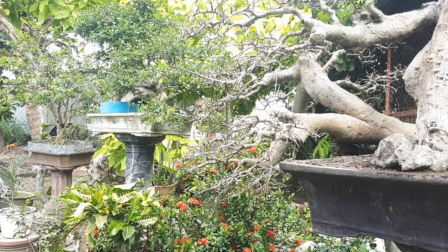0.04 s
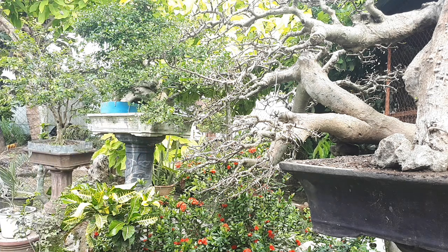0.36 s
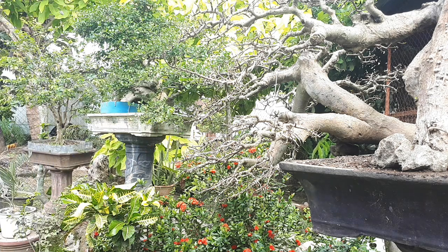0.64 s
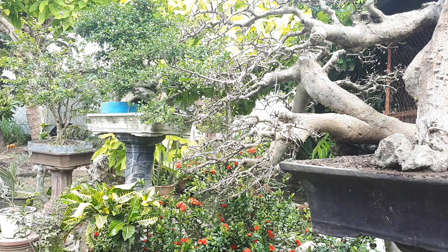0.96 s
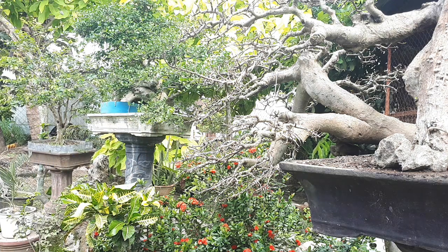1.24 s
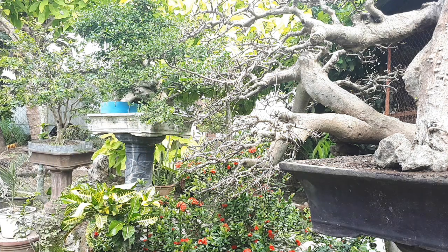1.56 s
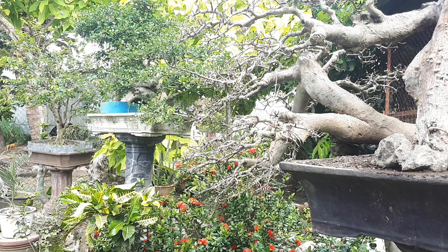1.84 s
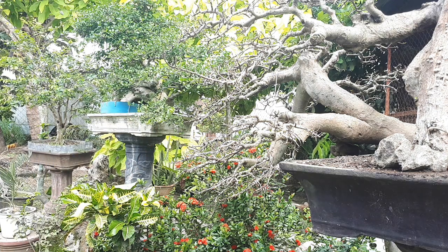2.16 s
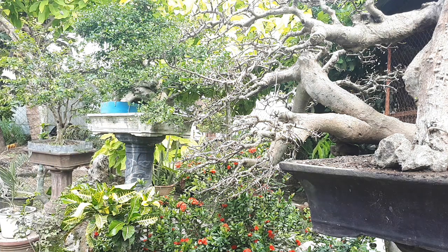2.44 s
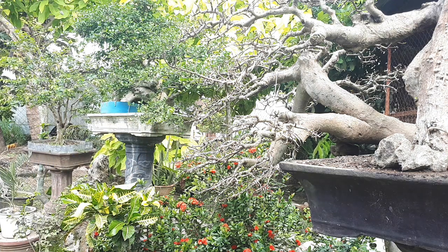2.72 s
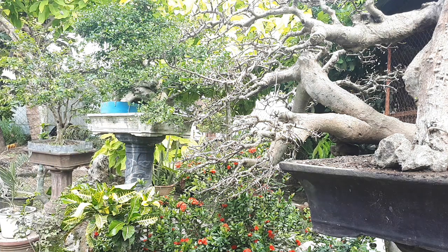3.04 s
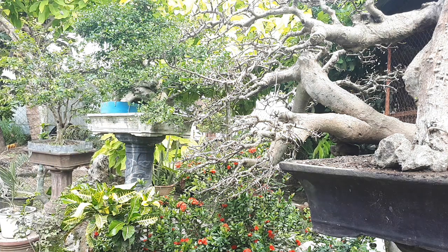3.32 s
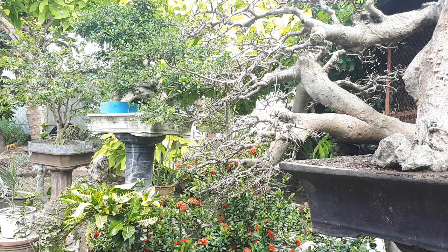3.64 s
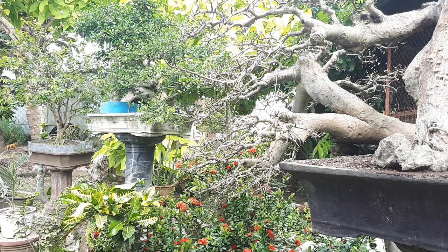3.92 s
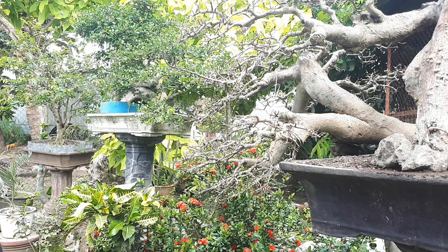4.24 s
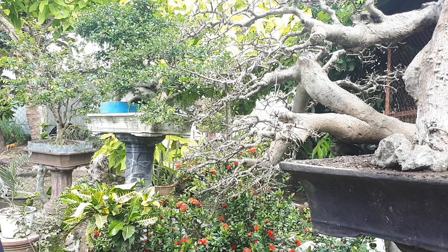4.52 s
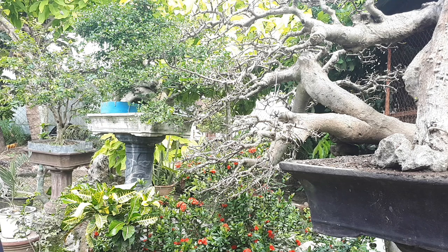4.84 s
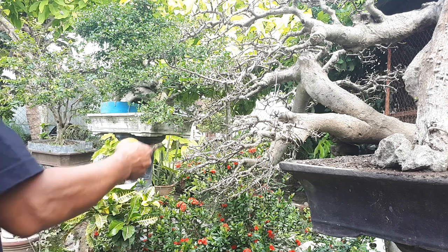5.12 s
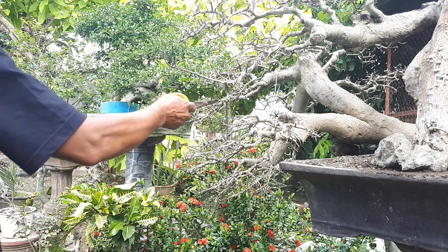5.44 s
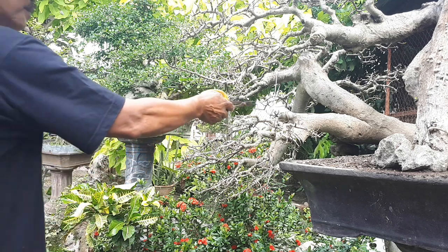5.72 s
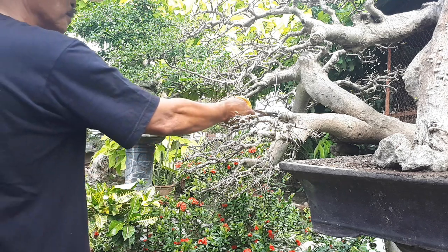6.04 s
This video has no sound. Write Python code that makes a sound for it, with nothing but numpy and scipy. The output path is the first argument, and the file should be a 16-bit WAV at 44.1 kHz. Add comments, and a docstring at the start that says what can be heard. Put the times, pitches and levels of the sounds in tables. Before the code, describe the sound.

In a walled garden, a dove coos in repeated phrases of clear hoots and throaty purrs. Early on, sandals crunch on grit, a higher dove answers with pure notes and a small bird gives three sharp chirps. Midway a myna squawks five harsh syllables. The cooing stops near the end, leaving a few soft foot scuffs. The calls ring slightly off the walls over low distant traffic and a soft hiss.

```python
"""Two doves coo in a walled garden: the lower slides between a clear hoot and a throaty purr of beating
tones and puffs, the higher answers in pure notes. A myna squawks five harsh syllables, a small bird
whistles trilled chips, faint hoots come from afar. Sandals tick and scuff on the paving, leaves rustle.
The walls ring after every call, over the low hum of distant traffic."""
import sys
import numpy as np
from scipy import signal
from scipy.fft import rfft, irfft, next_fast_len
from scipy.io import wavfile
from scipy.ndimage import uniform_filter1d, minimum_filter1d, map_coordinates

SR = 44100
rng = np.random.default_rng(int(sys.argv[2]) if len(sys.argv) > 2 else 0)


def transcribe(signal):
    """Save signal, clipped to [-1, 1], as a 16-bit WAV file at the path in sys.argv[1]."""
    frames = np.atleast_2d(signal).T
    limited = np.clip(frames, -1, 1)
    pcm = np.round(limited * 32767).astype(np.int16)
    wavfile.write(sys.argv[1], SR, pcm)


N = 272273


# clear hoots: (start [s], length [s], level [dB], pitch [Hz], glide [Hz/s])
LOW_HOOTS = [(-.02, .11, -34.5, 615, -1), (0.19, .085, -15, 622, 1.5), (.315, .055, -18, 623, 1),
             (0.421, .105, -12.5, 622, 1.5), (0.566, .045, -13, 570, -500),
             (1.793, .07, -15.5, 626.8, -0.5), (2.027, .165, -12, 618.3, -19.5),
             (2.405, .125, -13.5, 628, 0), (2.604, .06, -14.5, 625.5, 0.5),
             (2.669, .078, -10.5, 626.6, -45.5), (2.767, .085, -15, 583, -950),
             (3.32, .35, -37, 466.7, -170), (3.725, .072, -14.5, 619.5, -2.5), (3.934, .15, -10, 622.3, 5),
             (4.509, .13, -11.5, 621.3, -57), (4.655, .085, -15, 585, -900)]


def hoots(arch_hz=14, roundness=0.54):
    """Strength and pitch of the lower dove's clear voice: both arch over each hoot."""
    total, weighted_hz = np.zeros((2, N))
    for start, length, db, hz, glide in LOW_HOOTS:
        arch = swell(start, length)
        size = amp(db) * arch ** roundness * (arch > 1e-6)
        total += size
        weighted_hz += size * (hz + glide * (clock() - start - length / 2) - arch_hz * (1 - arch))
    return total, weighted_hz / (total + 1e-12)


# throaty rolls: (start [s], hold [s], release [s], level [dB], pitch [Hz], puff share [0-1])
LOW_ROLLS = [(-.02, .05, .1, -35.5, 619.5, 0.3), (.168, .14, 0.054, -21.5, 617.3, 0.84),
             (0.315, 0.043, 0.11, -17, 620, 0.84), (0.409, 0.1229, 0.095, -21.5, 615, .75),
             (0.551, .035, 0.29, -18, 595, .55), (1.369, 0.0997, 0.14, -24.5, 600, 0.7),
             (1.553, 0.1601, 0.15, -20, 603.5, 0.6), (1.796, 0.0576, 0.17, -20.5, 621.4, .6),
             (1.98, 0.0696, 0.099, -20, 599.4, 0.94), (2.126, 0.05907, 0.17, -26, 606.4, 0.6),
             (2.37, 0.199, 0.092, -21.5, 619.2, 0.59), (2.622, 0.0712, 0.12, -22.5, 619, .5),
             (2.782, 0.04034, 0.2173, -20, 585.5, 0.6), (2.98, 0.29, .2, -23.5, 600, 0.74),
             (3.705, 0.089, .1, -25, 613.3, .6), (3.876, 0.42, 0.074, -24.5, 606.5, .7),
             (4.282, .2, 0.21, -17.5, 611, 0.66), (4.645, 0.0853, 0.2, -19, 591, 0.65)]


def rolls(attack_s=0.0299, sag_hz_per_s=380):
    """Strength, pitch and puff share of the purr: each roll sets in, holds, then fades and sinks."""
    power, pitch, share = np.zeros((3, N))
    for start, hold, release, db, hz, puffy in LOW_ROLLS:
        dying_s = np.clip(clock() - start - hold, 0, 2 * release)
        edge = gate(start, hold + 1.25 * release, attack_s, release / 4)
        size = edge * amp(db - 20 * dying_s / release)
        power += size ** 2
        pitch += size ** 2 * (hz - sag_hz_per_s * dying_s)
        share += size ** 2 * puffy
    return np.sqrt(power), pitch / (power + 1e-12), np.clip(share / (power + 1e-12), 0, 1)


def puff_train(pitch, rate_hz, scatter, width_s, spread_db):
    """The voice breaks into short, uneven puffs of tone, each starting afresh."""
    beats = np.arange(int(N / SR * rate_hz))
    chance = rng.standard_normal((len(beats), 4))  # timing, pitch, size, phase
    centres = np.clip((beats + scatter * chance[:, 0]) / rate_hz * SR, 0, N - 1).astype(int)
    offsets = np.arange(-(SR // 50), SR // 50)
    t = offsets / SR
    hz = pitch[centres, None] * (1 + 0.043 * chance[:, 1:2])
    size = amp(spread_db * chance[:, 2:3]) * np.exp(-.5 * (t / width_s) ** 2)
    puffs = size * np.cos(2 * np.pi * hz * t + np.pi * chance[:, 3:])
    train = np.bincount(np.clip(centres[:, None] + offsets, 0, N).ravel(), puffs.ravel(), N + 1)[:N]
    # air pressure holds the mean strength steady over several puffs
    return train / np.sqrt(np.abs(uniform_filter1d(train ** 2, SR // 16)) + 1e-6)


def low_dove(beat_hz=82, purr_ducking=2.4):
    """A hoot breaks into a purr: a second, lower tone beats with it and the voice comes in puffs."""
    hoot_size, hoot_hz = hoots()
    purr_size, purr_hz, share = rolls()
    purr_size = purr_size / (1 + purr_ducking * hoot_size)
    lower_hz = purr_hz - beat_hz
    rough = purr_size / (purr_size + hoot_size + 1e-6)
    phase = cycle(hoot_hz * (1 + 0.0309 * rough ** 2 * wobble(110)))
    hoot = np.sqrt(2) * (np.sin(phase) + amp(-51.5) * np.sin(2 * phase))
    lower_size = np.sqrt(2) * amp(2.4 * wobble(70))
    lower = lower_size * np.sin(cycle(lower_hz * (1 + 0.04114 * share * wobble(110))))
    mid_hz = (purr_hz + lower_hz) / 2
    puffs = puff_train(mid_hz, rate_hz=63.83, scatter=0.158, width_s=0.0023, spread_db=-0.5)
    # the swollen throat passes only a faint overtone
    overtone = amp(-32) * puff_train(2 * mid_hz, rate_hz=63.2, scatter=0.23, width_s=0.001, spread_db=-5)
    purr = np.sqrt(1 - share) * lower + np.sqrt(share) * puffs + overtone
    return amp(2.5) * (hoot_size * hoot + purr_size * purr)


# answering coos: (start [s], rise [s], top pitch [Hz], sink [Hz/s], level [dB],
# time to crest [s], crest [dB], fade [dB/s])
HIGH_NOTES = [(0.531, 0.1, 806.3, 286.5, -19.5, 0.28, 7, 99.5),
              (1.03, .05, 794.6, 249, -20, 0.16, 8.5, 122.5),
              (1.375, .05, 791, 269.8, -19, 0.15, 8.5, 120.5),
              (1.76, 0.057, 773.5, 182, -15.5, 0.17, 5, 48.5)]


def high_dove(scoop_hz=96.8, max_sink_hz=75, crest_width_s=.048, waver=.006, tremor_db=2.0):
    """Nearly pure notes that scoop up, sink slowly, swell to a crest and fade with a tremor."""
    out = np.zeros(N)
    for start, rise, top_hz, sink, db, crest_s, crest_db, fade in HIGH_NOTES:
        t = np.maximum(clock() - start, 0)
        up, dying_s = np.minimum(t / rise, 1), np.maximum(t - crest_s, 0)
        sunk_hz = np.minimum(sink * np.maximum(t - rise, 0), max_sink_hz)
        pitch = top_hz - scoop_hz * (1 - up) ** 1.5 - sunk_hz
        phase = cycle(pitch * (1 + waver * wobble(70)))
        level_db = db + crest_db * np.exp(-((t - crest_s) / crest_width_s) ** 2) - fade * dying_s
        unsteady = 1 + np.minimum(dying_s / .05, 1)
        size = up * gate(start, .65, .01, .06) * amp(level_db + tremor_db * unsteady * wobble(45))
        out += size * (np.sin(phase) + amp(-67.5) * np.sin(2 * phase))
    return amp(2.4) * out * np.sqrt(2)


# glides within syllables: (start [s], length [s], level [dB], first pitch [Hz], last pitch [Hz],
# rasp [0-1], first throat resonance [Hz], last throat resonance [Hz], tilt [dB/harmonic])
MYNA_GLIDES = [(2.575, .08, -22, 2090, 2153, 0.37, 4107, 6360, -.6),
               (2.647, .085, -15.5, 1919, 2384, 0.33, 4000, 4620, -.8),
               (2.858, .065, -22.5, 2520, 2830, .21, 4900, 5500, .2),
               (2.915, .055, -15, 2345, 2288, 0.45, 5000, 4757, .8),
               (3.018, .075, -22, 1955, 2309, .42, 4100, 4430, .1),
               (3.285, .048, -22.5, 2542, 2113, .2, 4950, 4320, -1),
               (3.322, .045, -19, 2206, 2534, 0.72, 4710, 5610, .7),
               (3.36, 0.037, -18.5, 2192, 2150, .17, 6930, 6386, .7),
               (3.568, .08, -20, 2495, 2080, 0.47, 4800, 4360, .2),
               (3.643, .04, -19, 2121, 2097, .2, 6230, 6120, .7)]
# beak response: (frequency [Hz], gain [dB])
BEAK_RESPONSE = [(1200, -21), (1900, -21), (2400, 3.5), (2900, 20), (3400, 4.5), (4500, 5.5), (6500, 7.5),
                 (8000, 5.5), (9000, -2.5), (10500, 1), (12900, 14), (14500, -18)]


def myna(jitter=0.178, flutter=0.92, rasp_growth=.7, throat_width_hz=650, leak=0.11):
    """A harmonic voice that turns chaotic with rasp; the gliding throat picks out one overtone."""
    out = np.zeros(N)
    shake, tremor = wobble(1000), wobble(600)
    harmonic = np.arange(1, 7)[:, None]
    for start, length, db, hz0, hz1, mean_rasp, throat0, throat1, tilt_db in MYNA_GLIDES:
        edge = gate(start, length, attack_s=0.017, release_s=.012)
        on = edge > 0
        progress = (clock()[on] - start) / length
        pitch = hz0 + (hz1 - hz0) * progress
        throat_hz = throat0 + (throat1 - throat0) * progress
        rasp = mean_rasp * (1 + rasp_growth * (progress - .5))
        phase = cycle(pitch * (1 + jitter * rasp * shake[on]))
        gains = leak + 1 / (1 + ((harmonic * pitch - throat_hz) / throat_width_hz) ** 2)
        partials = gains * amp(tilt_db * (harmonic - 3)) * np.sin(harmonic * phase)
        voice = partials.sum(axis=0) / np.linalg.norm(gains, axis=0)
        out[on] += edge[on] * amp(db) * voice * (1 + flutter * rasp * tremor[on])
    return coloured(out, BEAK_RESPONSE)


# myna's side tones: (start [s], length [s], pitch [Hz], level [dB])
SYRINX_NOTES = [(2.69, 0.019, 2722, -24.5), (3.325, 0.074, 2625, -25), (3.595, 0.053, 2338, -29),
                (3.635, 0.046, 2423, -22)]


def myna_second_voice():
    """The other side of the syrinx adds short, rough tones."""
    return notes(SYRINX_NOTES, waver=0.027, rate_hz=700)


# chips: (start [s], level [dB], pitch [Hz], overtone [dB], trill depth [ratio])
BIRD_CHIPS = [(0.0, -40, 5194, -15.5, 0.16), (0.689, -17.5, 5165, -13, 0.19),
              (1.349, -17.5, 5200, -13, 0.31), (1.975, -18, 5094, -14.5, 0.27)]


def small_bird(fade_s=0.055, trill_hz=205, trill_decay_s=0.022):
    """Each chip is a whistle that flicks upward in a fast trill, then settles on its pitch."""
    out = np.zeros(N)
    for start, db, hz, overtone_db, depth in BIRD_CHIPS:
        t = np.maximum(clock() - start, 0)
        flick = (.5 + .5 * np.cos(2 * np.pi * trill_hz * t)) ** 2 - .15
        bend = depth * np.exp(-t / trill_decay_s) * flick + .009 * wobble(700)
        phase = cycle(hz * (1 + bend))
        size = (1 - np.exp(-t / .0025)) * np.exp(-(t / fade_s) ** 2)
        # driven higher, the whistle gains overtone
        overtone = amp(overtone_db + 55 * bend) * np.exp(-t / 0.03) * np.sin(2 * phase)
        out += amp(db) * size * (np.sin(phase) + overtone)
    return out


# cracking grains: (start [s], peak [dB], pitch [Hz], sharpness [Q])
GRIT_TICKS = [(0.043, -32.5, 2610, 2), (0.088, -25, 2300, 2), (0.113, -34.5, 2600, 2),
              (0.168, -36.5, 2400, 2), (.251, -20.5, 2550, 1.5), (.279, -17, 4100, .7),
              (0.3198, -3, 4010, .9), (0.418, -14.5, 4520, .4), (0.465, -36, 6140, .4),
              (5.463, -25.5, 1810, .3), (5.661, -29, 3020, .5), (5.678, -32, 4960, .5),
              (5.704, -19, 9020, .6)]


def grit(decay_s=0.0018):
    """Grains crack under a sole: short noise bursts, each around one pitch."""
    out, t = np.zeros(N + SR), np.arange(SR // 20) / SR
    for start, db, hz, q in GRIT_TICKS:
        burst = rng.standard_normal(len(t)) * t * np.exp(-t / decay_s)
        ring = signal.iirpeak(hz, max(q, 3 * hz / SR), SR)
        crack = signal.lfilter(*ring, signal.lfilter(*ring, burst))
        out[round(start * SR):][:len(t)] += amp(db) * crack / np.abs(crack).max()
    return out[:N]


# sole slides: (peak time [s], rise [s], fall [s], level [dB])
SOLE_SLIDES = [(0.409, 0.016, 0.0093, -18), (0.457, 0.032, 0.022, -33.5), (5.455, 0.1, 0.064, -42),
               (5.734, .026, 0.0081, -21), (5.73, 0.11, 0.2, -44), (6.172, 0.025, 0.012, -34)]
# friction spectrum: (frequency [Hz], density [dB])
SOLE_SPECTRUM = [(590, -36), (1000, -11), (1430, -14), (1650, -4), (1810, -10.5), (2620, -5.5), (7440, -12),
                 (8360, -22.5), (12500, -9), (16000, -24)]


def sandals(grain_db=5.0):
    """Grainy friction swells and stops as a sole slides."""
    t = clock()
    stroke = sum(amp(db) * np.exp(-((t - peak_s) / np.where(t < peak_s, rise, fall)) ** 2)
                 for peak_s, rise, fall, db in SOLE_SLIDES)
    grains = rng.standard_normal(N) * amp(grain_db * wobble(900))
    return stroke * unit(coloured(grains, SOLE_SPECTRUM))


# distant hoots: (start [s], length [s], pitch [Hz], level [dB])
FAR_HOOTS = [(0.414, 0.32, 302, -39), (2.402, 0.41, 412, -37), (2.72, 0.047, 840, -38),
             (3.209, 0.081, 913.6, -41), (3.86, 0.26, 358, -29.5), (4.19, 0.0635, 906.6, -38),
             (4.575, 0.25, 295, -38.5), (5.853, 0.11, 864, -47)]


def far_doves():
    """Short, faint, unsteady hoots."""
    return notes(FAR_HOOTS, waver=0.033, rate_hz=54)


# rustle spectrum: (frequency [Hz], density [dB])
LEAF_SPECTRUM = [(800, -24), (1500, 0.5), (2600, 1.5), (3600, -16), (8000, -46.5), (16000, -50.5)]


def leaves(peak_s=0.058, rise_s=0.12, level_db=-41.5, fade_db_per_s=36.5, clump_db=4):
    """A brief, soft rustle of dry leaves that rises and fades."""
    t = clock() - peak_s
    rise = np.exp(-(np.minimum(t, 0) / rise_s) ** 2)
    size = rise * amp(level_db - fade_db_per_s * np.maximum(t, 0))
    return size * unit(amp(clump_db * wobble(80)) * rush(LEAF_SPECTRUM, side_db=-2.0))


# traffic swell: (time [s], gain [dB])
TRAFFIC_GAIN = [(0, -37.5), (1.5, -36.5), (2.8, -35), (4.2, -37), (6.17, -38)]
# rumble spectrum: (frequency [Hz], density [dB])
TRAFFIC_SPECTRUM = [(12, -71), (20, -34), (42, -1), (80, 2), (113, 1.5), (232, -13), (295, -9), (332, -14),
                    (422, -12), (476, -23.5), (594, -11.5), (659, -28), (852, -17), (960, -22.5),
                    (1200, -34.5), (1560, -65.5), (2640, -120)]


def traffic(engine_hz=87):
    """Distant rumble with one engine's drone."""
    gain_db = np.interp(clock(), *np.transpose(TRAFFIC_GAIN))
    drone = amp(-2.5 + wobble(4.2)) * np.sin(cycle(engine_hz * (1 + 0.014 * wobble(5.1))))
    return amp(gain_db + .5 * wobble(3.7)) * (amp(1.0) * rush(TRAFFIC_SPECTRUM, side_db=-10.5) + drone)


# hiss spectrum: (frequency [Hz], density [dB])
AIR_SPECTRUM = [(530, -28), (900, -4), (1850, -6.5), (2250, -8), (2540, -8.5), (5350, -14.5),
                (11700, -15.5), (14900, -13), (16000, -26.5)]


def air(level_db=-48):
    """A soft, even hiss."""
    return amp(level_db + 0.43 * wobble(8.6)) * rush(AIR_SPECTRUM, side_db=0.5)


# wall reverberation: (frequency [Hz], T60 [s])
GARDEN_T60 = [(300, 0.8), (700, 0.7), (2500, 0.39), (5500, 0.43), (9000, 0.37), (14000, .36)]


def garden(x, wet_db, early_db, pan_db, lag_ms):
    """Direct sound at two microphones, scatter off nearby pots and walls, and a dying tail."""
    hz, t, noise = signal.stft(rng.standard_normal((2, SR * 3 // 4)), SR, nperseg=256)
    tail = signal.istft(noise * amp(-60 * t / along(GARDEN_T60, hz)[:, None]), SR, nperseg=256)[1]
    age_s = np.arange(tail.shape[1]) / SR
    early = rng.standard_normal(tail.shape) * np.exp(-age_s / 0.019)
    echo = amp(wet_db) * tail / np.linalg.norm(tail[0])
    echo += amp(early_db) * early / np.linalg.norm(early[0])
    sides = np.array([[.5], [-.5]])
    direct = filtered(x, lambda f: amp(sides * pan_db) * np.exp(-2j * np.pi * f * sides * lag_ms / 1000))
    delayed = np.pad(x, (SR // 200, 0))
    return direct + signal.fftconvolve(delayed[None], echo, axes=1)[:, :N]


def notes(table, waver, rate_hz):
    """Short tones that swell and fade while their pitch wavers."""
    bend = 1 + waver * wobble(rate_hz)
    return sum(amp(db) * swell(start, length) * np.sin(cycle(hz * bend))
               for start, length, hz, db in table)


def swell(start_s, length_s):
    """Half a sine over one call."""
    return np.maximum(np.sin(np.pi * np.clip((clock() - start_s) / length_s, 0, 1)), 0)


def gate(start_s, length_s, attack_s, release_s):
    """One while a call lasts, with sloping edges."""
    t = clock() - start_s
    return np.clip(np.minimum(t / attack_s, (length_s - t) / release_s), 0, 1)


def wobble(rate_hz):
    """Smooth random curve, rate_hz knots a second."""
    return map_coordinates(rng.standard_normal(int(N * rate_hz / SR) + 4), [clock() * rate_hz])


def cycle(hz):
    """Running phase of a moving pitch."""
    return 2 * np.pi * np.cumsum(hz) / SR


def rush(spectrum, side_db):
    """Coloured stereo noise of rms 1."""
    mid, side = coloured(rng.standard_normal((2, N)), spectrum)
    return unit(np.array([mid + amp(side_db) * side, mid - amp(side_db) * side]))


def coloured(x, spectrum):
    """x shaped by (Hz, dB) points."""
    return filtered(x, lambda hz: amp(along(spectrum, hz)))


def filtered(x, response):
    """x through a complex frequency response."""
    size = next_fast_len(N + SR // 2)
    return irfft(rfft(x, size) * response(np.fft.rfftfreq(size, 1 / SR)), size)[..., :N]


def along(points, hz):
    """(Hz, value) points interpolated on a log axis."""
    knots_hz, values = np.transpose(points)
    return np.interp(np.log(hz + 1), np.log(knots_hz + 1), values)


def amp(db):
    return 10 ** (np.asarray(db) / 20)


def unit(x):
    return x / np.sqrt(np.mean(x ** 2) + 1e-20)


def clock():
    return np.arange(N) / SR


def scene():
    """Birds and feet ring in the garden according to distance, over leaves, traffic and hiss."""
    doves = garden(low_dove(), wet_db=-11.5, early_db=-9, pan_db=0.5, lag_ms=-0.29)
    doves += garden(high_dove(), wet_db=-12.0, early_db=-13.0, pan_db=-2.0, lag_ms=-0.31)
    doves += garden(far_doves(), wet_db=0.5, early_db=-9.5, pan_db=-2.5, lag_ms=0)
    birds = garden(myna() + myna_second_voice(), wet_db=3.0, early_db=-0.5, pan_db=-0.5, lag_ms=-0.361)
    birds += garden(small_bird(), wet_db=6.0, early_db=-2.0, pan_db=3.0, lag_ms=-0.15)
    feet = garden(sandals(), wet_db=-17.5, early_db=-4.0, pan_db=2.5, lag_ms=-.12)
    feet += garden(grit(), wet_db=-9.0, early_db=-10.0, pan_db=-1.5, lag_ms=-0.027)
    return doves + birds + feet + leaves() + traffic() + air()


def record(dry):
    """The phone's limiter ducks the highest peaks; nothing passes above its band limit."""
    window, top_hz = SR // 200, 15700
    needed = 1 / np.maximum(np.abs(dry).max(axis=0), 1)
    gain = uniform_filter1d(minimum_filter1d(needed, window), window)
    return filtered(dry * gain, lambda hz: hz < top_hz)


dry = scene()
out = record(dry)
transcribe(out)
```